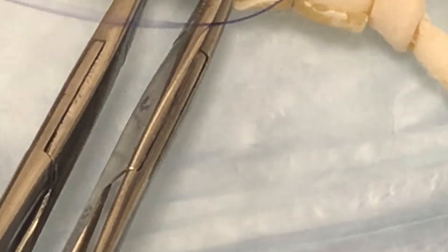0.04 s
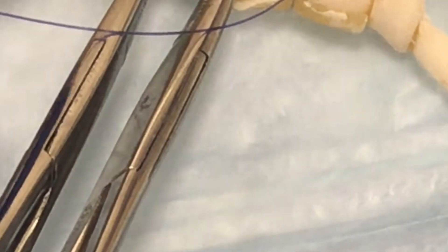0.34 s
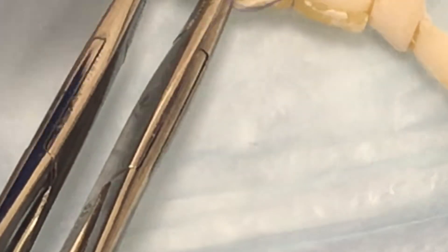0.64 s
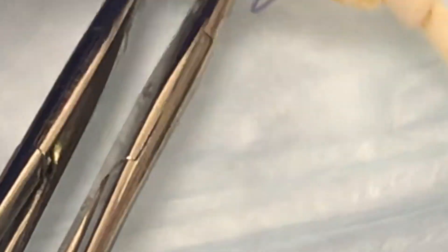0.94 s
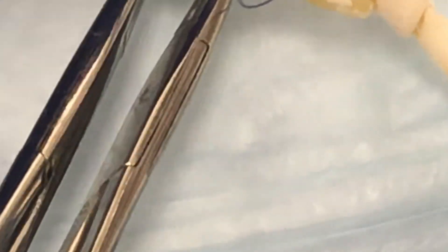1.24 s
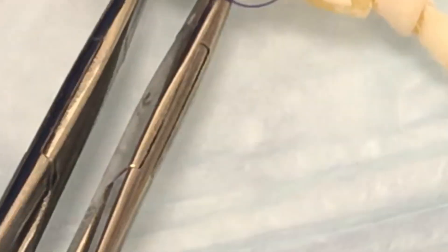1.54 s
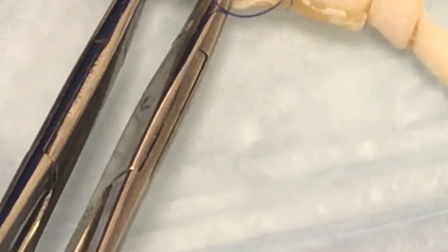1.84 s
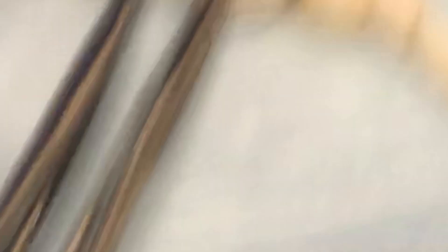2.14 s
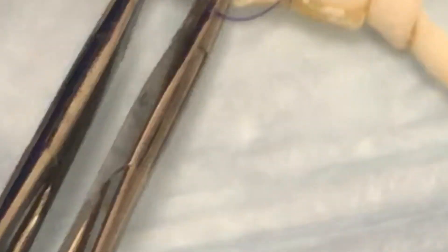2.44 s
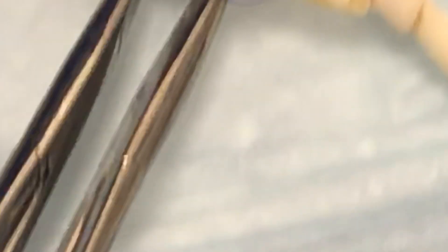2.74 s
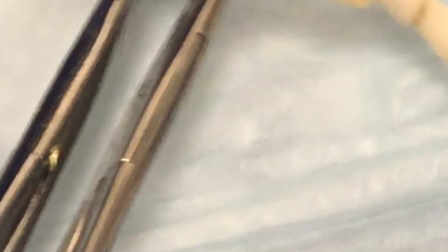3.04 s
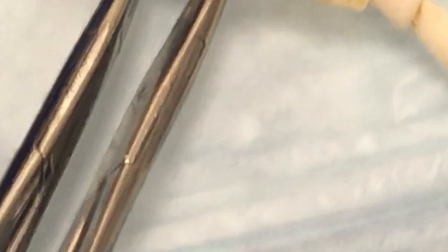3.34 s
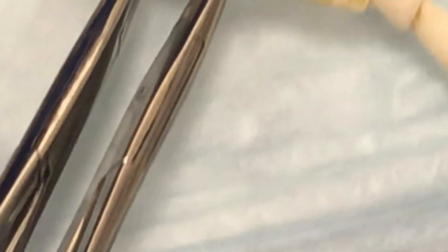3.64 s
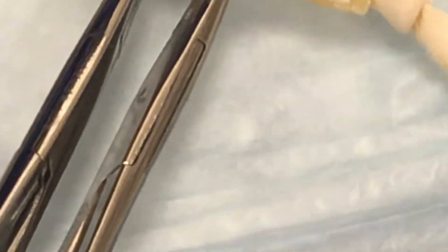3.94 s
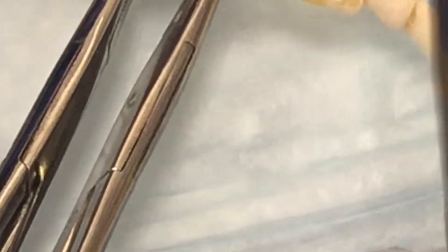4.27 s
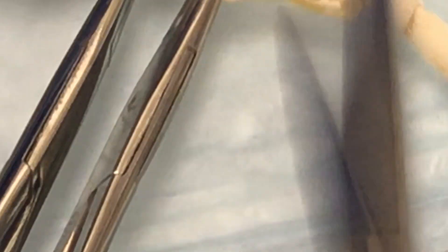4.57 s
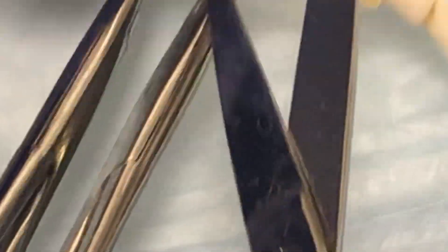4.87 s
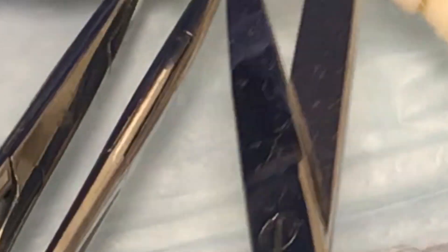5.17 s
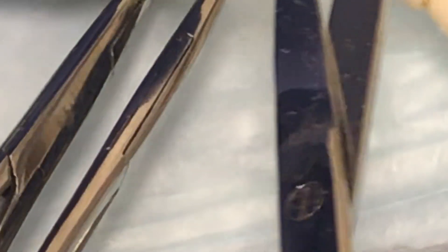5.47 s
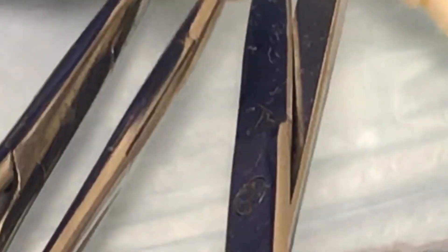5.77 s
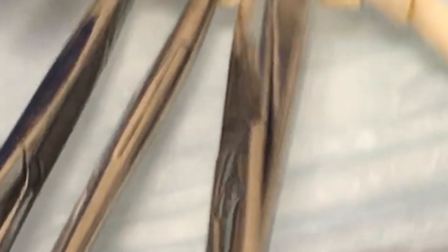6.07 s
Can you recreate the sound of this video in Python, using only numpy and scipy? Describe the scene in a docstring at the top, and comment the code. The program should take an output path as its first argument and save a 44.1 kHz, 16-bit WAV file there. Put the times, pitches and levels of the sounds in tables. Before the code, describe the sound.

In a small room with a low ventilation rumble, steel surgical instruments tick close to the microphone with a light knock, and thread and gloves rustle faintly. Scissors snip once. An instrument skids, clinks and lands on the table with a clack and a soft thud, then more tools knock and slide on the hollow-sounding top. Small ticks and quiet rustling finish it.

```python
"""A suture is tied with steel instruments over a table in a small room, above a low ventilation rumble.
Jaws tick close to the microphone with a light knock, then thread and gloves rustle. At 1.75 s scissors
snip; an instrument skids, clinks and is laid down with a clack and a thud. Until 3.7 s others knock and
slide, sounding the table's top, frame and hollow panel. Small ticks and rustling close the scene."""
import sys
import numpy as np
from scipy import signal
from scipy.fft import rfft, irfft, next_fast_len
from scipy.io import wavfile

SR = 44100
rng = np.random.default_rng(int(sys.argv[2]) if len(sys.argv) > 2 else 0)


def inscribe(sig):
    """Save sig as 16-bit PCM at rate SR to the path in sys.argv[1].

    A 1-D sig is mono; a 2-D sig holds one channel per row.
    Samples are clipped to [-1, 1] before scaling.
    """
    pcm = np.round(np.clip(np.atleast_2d(sig).T, -1, 1) * 32767)
    wavfile.write(sys.argv[1], SR, pcm.astype(np.int16))


N = 278226
TIME = np.arange(N) / SR
AGE = TIME[:SR * 3 // 4]  # time since a contact [s]

# knocks on the table: (time [s], level [dB], contact low-pass [Hz], pitch of the top at that spot [Hz],
# top [dB], frame boom [dB], hollow panel [dB])
TABLE_KNOCKS = [(0.0656, -8.5, 8400, 1454, 3.5, 0.5, -35), (2.115, -8, 1792, 1260, 4.5, -3.5, -1),
                (2.1253, 6.5, 6500, 1230, -0.5, -2.5, -6.5), (2.134, 6, 3500, 1190, 2.5, 2, 0),
                (2.14, 2, 3200, 1400, -8, -8, -8.5), (2.171, -2.5, 6000, 1264, -8.5, -11.5, -5),
                (2.2103, -4.5, 4040, 1271, 0, -10, -11), (2.2152, 9, 7070, 1238, -16, 14, -2.5),
                (2.5388, -1.5, 1700, 1340, -4, 13, -4), (2.6198, -4, 2000, 1384, 2, -6, -14),
                (2.641, 6.5, 5130, 1470, 4, -5, -2.5), (2.6986, 12, 12500, 1283, 9, 2.5, -2),
                (2.714, 11, 9450, 1329, 4.5, -5, -39), (2.988, -3.5, 3040, 1300, -12, -1, -4.5),
                (3.069, 10.5, 7210, 1267, 5, -2.5, -14), (3.1988, 16.5, 11000, 1153, 4.5, -24, 7.5),
                (3.2016, 13.5, 2200, 1246, -7.5, 0, 11.5), (3.287, -4, 1500, 1215, 9.5, -15, -15),
                (3.3312, 1, 3530, 1150, 2.5, -25, 1), (3.6679, 9, 1970, 1153, -1.5, 4, 1.5)]
# the table top, retuned by each knock: (frequency [Hz], width [Hz], gain [dB])
TOP_MODES = [(1221, 62, -0.5), (1204, 230, -17), (1514, 330, -20), (2070, 160, -17.5), (2550, 130, -19)]
# the boom of its frame: (frequency [Hz], width [Hz], gain [dB])
FRAME_MODES = [(261.5, 9.3, -0.5), (311, 38, -6.5), (385, 70, -24.5)]
# its hollow panel: (frequency [Hz], width [Hz], gain [dB])
PANEL_MODES = [(480, 37, -19), (550, 29, -5.5), (630, 40, -13), (684, 13, -14)]
# EQ of a knock's clatter: (frequency [Hz], gain [dB])
CLATTER_EQ = [(70, -35.5), (160, -19.5), (300, -12.5), (520, -18), (830, -18.5), (1150, -9), (1800, -12),
              (2800, -15.5), (4800, -19.5), (7000, -20), (9500, -20.5), (16000, -18)]
# steel meets steel or table: (time [s], crack [dB], ring [dB], room send [dB], ring time [factor])
STEEL_CLINKS = [(1.9562, -14, 1, -7.5, 0.36), (1.9925, -26, -12, -8.5, 0.56),
                (2.0285, -29, -13.5, -8.5, .6), (2.1257, -13, -16.5, -10, 0.5),
                (2.151, -16.5, -8, -13, 1.4), (2.216, 10, -4.5, 3, 0.77), (2.9893, -26, -11.5, -2.5, .4),
                (3.6656, -37.5, -33, 8, 0.77)]
# EQ of a clink's crack: (frequency [Hz], gain [dB])
CRACK_EQ = [(100, -6), (300, -12), (520, -2), (800, -11.5), (1150, 2), (2000, -0.5), (4000, 1), (5500, 0),
            (8300, -1.5), (11000, -3), (15500, -3)]
# ring of the instrument: (frequency [Hz], gain [dB], base t60 [s])
STEEL_MODES = [(220.6, -44, 0.12), (1076, -48, .2), (1227, -43.5, 0.3), (1580, -48.5, 0.18),
               (2500, -52, 0.19), (2670, -45, 0.15), (4095, -49, 0.06), (4250, -53, 0.12), (4480, -53, 0.1),
               (6100, -54.5, 0.15), (6527, -49.5, .2), (8470, -51, 0.11), (9200, -52, .3),
               (8800, -52.5, 0.089), (10140, -56, 0.18), (11400, -53.5, 0.2), (11800, -46.5, 0.19),
               (11530, -43, .22), (11580, -49.5, .2), (13590, -51, .8), (13860, -50.5, 0.25),
               (14250, -54, .15), (15390, -40, .15)]
# the blades bite through and hit their stop: (time [s], level [dB], t60 [s], high-pass [Hz])
SNIP_HITS = [(1.7519, 3, 0.0018, 189), (1.7527, 0, .003, 1508), (1.755, -6, .014, 9600)]
# EQ of the snip: (frequency [Hz], gain [dB])
SNIP_EQ = [(300, -3), (800, -2), (1300, 1), (1700, -3.5), (2500, 5), (4000, 0.5), (7000, -4), (10000, 0.5),
           (13500, 3), (16000, -3.5)]
# ring of the blades: (frequency [Hz], gain [dB], t60 [s])
BLADE_MODES = [(5423, -55.5, .33), (5749, -58, .35), (7220, -46, 0.24), (8860, -57, .3),
               (11110, -78.5, 0.35), (12000, -53, 0.19), (12770, -51, .18)]
# jaws and ratchets close by: (time [s], level [dB], high-pass [Hz], low-pass [Hz])
JAW_TICKS = [(0.0643, -15, 1760, 3000), (0.1641, -23, 1310, 3100), (1.6078, -17, 7200, 18300),
             (1.8806, -29, 4470, 11300), (3.5735, -33, 2190, 12000), (4.158, -28.5, 2470, 8170),
             (4.204, -25, 3130, 9000), (4.226, -26, 5500, 14000), (4.2511, -16, 2300, 18000),
             (4.5149, -26.5, 1900, 3630), (4.9167, -19.5, 9570, 17820), (5.976, -32, 5080, 10800)]
# the instrument skids on its edge as it is lowered: (start [s], length [s], rasp [dB], squeak [dB])
EDGE_SKIDS = [(1.958, .015, -43.5, -55.5), (1.991, .008, -44, -56), (2.023, .033, -47.5, -48),
              (2.149, .025, -53, -61)]
# steel is pushed across the table: (start [s], length [s], level [dB])
TABLE_SLIDES = [(2.12, 0.025, -59), (2.24, 0.094, -46), (2.524, 0.074, -51.5), (2.79, 0.075, -66.5),
                (2.891, 0.05, -54.5), (2.988, 0.04, -53.5), (3.116, 0.07, -50.5), (3.338, 0.072, -62),
                (3.417, 0.034, -50.5)]
# the weight of the hand lands on the table: (time [s], level [dB])
HAND_THUDS = [(2.219, 4.5), (2.243, 9), (2.538, 5.5)]
# sway of the whole table: (frequency [Hz], width [Hz], gain [dB])
THUD_MODES = [(108, 31, 1.5), (125, 16, -4)]
# thread and gloves rub: (middle [s], length [s], level [dB], high-pass [Hz])
RUB_SWELLS = [(0.193, 0.17, -71.5, 1200), (0.3, 0.049, -68.5, 4000), (0.767, 0.081, -70.5, 3000),
              (0.943, 0.071, -59.5, 2830), (1.133, 0.09, -67, 3000), (1.392, 0.17, -69, 4000),
              (2.594, 0.26, -62, 3500), (3.513, 0.47, -65.5, 3000), (3.908, 0.064, -62, 2500),
              (4.196, 0.097, -59, 2640), (4.255, 0.84, -67, 2420), (4.67, 0.042, -61, 1500),
              (4.83, .1, -70.5, 2506), (5.079, 0.16, -65, 2440), (5.356, 0.045, -65, 1590),
              (5.83, 0.073, -67.5, 1610), (6.022, 0.096, -66.5, 1110), (6.153, 0.27, -70.5, 796)]
# EQ of the rustle: (frequency [Hz], gain [dB])
RUB_EQ = [(1500, 8), (3000, -0.5), (6000, 0.5), (9000, -0.5), (13000, -2.5), (16000, -7.5)]
# EQ of the ventilation's rumble and hiss: (frequency [Hz], gain [dB])
AIR_EQ = [(30, -10.5), (55, 3), (90, -7), (140, -4), (200, -8.5), (300, -14), (450, -18.5), (800, -25.5),
          (1500, -27), (3000, -32), (6000, -37.5), (10000, -38), (16000, -37.5)]
# its drones: (frequency [Hz], width [Hz], level [dB])
VENT_DRONES = [(54.2, 2.7, -66), (118, 1.6, -70), (287, 11, -78), (1083, 64, -81.5)]
# decay of the room: (frequency [Hz], t60 [s])
ROOM_T60 = [(100, 0.69), (260, 0.47), (700, 0.4), (1840, 0.41), (4850, 0.46), (9000, 0.45), (14000, 0.21)]
# EQ of the reverb: (frequency [Hz], gain [dB])
ROOM_EQ = [(60, -0.5), (110, 16.5), (180, 4), (300, 4), (410, -2.5), (650, 6), (1250, -3), (4000, -3.5),
           (8000, -7.5), (15000, -7)]

TICK_T60_S = 0.02  # the fingers damp every tick alike


def knocks(clatter_t60, top_send_db, room_db):
    """Blows drive the table's top, frame and panel by where they land; a soft contact loses treble."""
    out, send = np.zeros(N), np.zeros(N)
    click = signal.unit_impulse(len(AGE))
    frame, panel = resonate(click, FRAME_MODES), resonate(click, PANEL_MODES)
    pulse = equalise(click, CLATTER_EQ)
    for s, db, contact_hz, top_hz, top_db, frame_db, panel_db in TABLE_KNOCKS:
        retuned = [(hz * top_hz / TOP_MODES[0][0], width, gain) for hz, width, gain in TOP_MODES]
        top = from_db(top_db) * resonate(click, retuned)
        boom = from_db(frame_db) * frame + from_db(panel_db) * panel
        clatter = equalise(burst(clatter_t60, edge=0.16), CLATTER_EQ)
        add(out, s, from_db(db) * cut(top + boom + clatter, contact_hz, "low"))
        # the table's modes are strong nearby and spread less into the room
        spread = pulse + from_db(top_send_db) * top + from_db(-2) * boom
        add(send, s, from_db(db + room_db) * cut(spread, contact_hz, "low"))
    return out, cut(send, 9000, "low", order=1)


def clinks(crack_t60, ring_send_db):
    """Steel cracks on contact and rings as the fingers allow; thin shanks feed the room only weakly."""
    out, send = np.zeros(N), np.zeros(N)
    # summed over all directions the crack is one clean pulse
    pulse = equalise(signal.unit_impulse(len(AGE)), CRACK_EQ)
    for s, crack_db, ring_db, room_db, sustain in STEEL_CLINKS:
        held_modes = [(hz, db, t60 * sustain) for hz, db, t60 in STEEL_MODES]
        tone = from_db(ring_db) * ring(held_modes, uneven_db=2.5)
        crack = from_db(crack_db) * equalise(burst(crack_t60), CRACK_EQ)
        add(out, s, crack + tone)
        add(send, s, from_db(room_db) * (from_db(crack_db) * pulse + from_db(ring_send_db) * tone))
    return out, send


def snip(ring_db, thump_db, thump_hz, room_db, send_highpass_hz):
    """Scissors snap shut and ring faintly; the released thread jolts the practice pad with a thump."""
    blades, thump = np.zeros(N), np.zeros(N)
    for s, db, t60, highpass_hz in SNIP_HITS:
        bite = equalise(burst(t60, edge=0.7), SNIP_EQ)
        add(blades, s, from_db(db) * cut(bite, highpass_hz, "high", order=1))
    shut_s = SNIP_HITS[1][0]
    add(blades, shut_s, from_db(ring_db) * ring(BLADE_MODES, uneven_db=1.5))
    jolt = cut(signal.unit_impulse(len(AGE)), thump_hz, "low")
    add(thump, shut_s, from_db(thump_db) * cut(jolt, 70, "high"))
    return blades - thump, from_db(room_db) * cut(blades, send_highpass_hz, "high")


def ticks(room_db):
    """Jaws held in the hand meet in tiny damped clicks."""
    out = np.zeros(N)
    for s, db, highpass_hz, lowpass_hz in JAW_TICKS:
        tick = cut(burst(TICK_T60_S, edge=0.76), highpass_hz, "high")
        add(out, s, from_db(db) * cut(tick, lowpass_hz, "low"))
    return out, from_db(room_db) * out


def skids(width_hz, attack_s, release_t60, room_db):
    """Rapid slips drive the steel's modes, which the contact damps and widens; the edge squeaks."""
    slips = grains(per_s=1400, spread_db=2)
    rasp = unit_rms(resonate(slips, [(hz, width_hz, db) for hz, db, _ in STEEL_MODES[1:]]))
    squeak_modes = [(12200, 220, -4), (12400, 300, 0.5), (12900, 700, -6.5), (15400, 500, -1.5)]
    squeak = unit_rms(resonate(slips, squeak_modes))
    out = np.zeros(N)
    for s, length, rasp_db, squeak_db in EDGE_SKIDS:
        scrape = from_db(rasp_db) * rasp + from_db(squeak_db) * squeak
        out += stroke(s, length, attack_s, release_t60) * scrape
    return out, from_db(room_db) * out


def slides(lowpass_hz, frame_db, panel_db, attack_s, release_t60, room_db):
    """Dense stick and slip of steel on the table keeps its top humming."""
    slips = cut(grains(per_s=6000, spread_db=1.5), lowpass_hz, "low")
    body = resonate(slips, TOP_MODES)
    body += from_db(frame_db) * resonate(slips, FRAME_MODES)
    body += from_db(panel_db) * resonate(slips, PANEL_MODES)
    push = sum(from_db(db) * stroke(s, length, attack_s, release_t60) for s, length, db in TABLE_SLIDES)
    out = push * unit_rms(body)
    return out, from_db(room_db) * out


def thuds(room_db):
    """A soft, heavy push of the hand sways the whole table."""
    out = np.zeros(N)
    sway = cut(resonate(signal.unit_impulse(len(AGE)), THUD_MODES), 170, "low")
    for s, db in HAND_THUDS:
        add(out, s, from_db(db) * sway)
    return out, from_db(room_db) * out


def rustle(crackles_per_s, crackle_db, crackle_highpass_hz, room_db):
    """Thread runs through the jaws and gloves brush: short swells of grainy hiss."""
    hiss = unit_rms(equalise(grains(per_s=3500, spread_db=1), RUB_EQ))
    # the hands never rest quite still: faint crackles at random
    twitches = grains(per_s=crackles_per_s, spread_db=4)
    crackle = signal.fftconvolve(twitches, burst(TICK_T60_S, edge=0.5))[:N]
    out = from_db(crackle_db) * unit_rms(cut(equalise(crackle, RUB_EQ), crackle_highpass_hz, "high"))
    for s, length, db, highpass_hz in RUB_SWELLS:
        during = np.abs(TIME - s) < length / 2
        swell = np.cos(np.pi * (TIME[during] - s) / length)
        out[during] += from_db(db) * swell * cut(hiss[during], highpass_hz, "high")
    return out, from_db(room_db) * out


def ventilation(air_db):
    """A steady bed of rumble and hiss with a few narrow drones."""
    drones = sum(from_db(db) * unit_rms(resonate(rng.standard_normal(N), [(hz, width, 0)]))
                 for hz, width, db in VENT_DRONES)
    return drones + from_db(air_db) * unit_rms(equalise(rng.standard_normal(N), AIR_EQ))


def room(send, build_s):
    """Diffuse echoes build up within milliseconds and die sooner in the treble."""
    noise, hz = rfft(rng.standard_normal(len(AGE))), np.fft.rfftfreq(len(AGE), 1 / SR)
    edges_hz, tail = np.geomspace(40, 20000, 19), 0
    onset = 1 - np.exp(-(AGE / build_s) ** 2)
    for low, high in zip(edges_hz, edges_hz[1:]):
        centre = np.sqrt(low * high)
        envelope = onset * fade(at_hz(ROOM_T60, centre))
        band = irfft(noise * ((hz >= low) & (hz < high)), len(AGE))
        tail += from_db(at_hz(ROOM_EQ, centre)) * band * envelope / np.linalg.norm(envelope)
    return signal.fftconvolve(send, tail)[:N]


def ring(modes, uneven_db):
    """Decaying sines: each touch gives every mode a strength and sign of its own."""
    out = 0
    for hz, db, t60 in modes:
        gain = rng.choice([-1, 1]) * from_db(db + uneven_db * rng.standard_normal())
        out += gain * np.sin(2 * np.pi * hz * AGE) * fade(t60)
    return out


def burst(t60, edge=0):
    """Countless close modes struck at once: dying noise of unit energy; edge adds a close-up click."""
    x = rng.choice([-1, 1], len(AGE)) * fade(t60)
    x = x / np.linalg.norm(x) + edge * signal.unit_impulse(len(AGE))
    return x / np.linalg.norm(x)


def grains(per_s, spread_db):
    """Random micro-slips of uneven size, at unit rms."""
    size = from_db(spread_db * np.minimum(rng.exponential(1, N), 4))
    slipping = rng.random(N) < per_s / SR
    return unit_rms(slipping * size * rng.standard_normal(N))


def stroke(start, length, attack_s, t60):
    """Friction builds up, holds while the push lasts, then dies away."""
    rise = np.clip((TIME - start) / attack_s, 0, 1)
    return rise * from_db(-60 * np.clip((TIME - start - length) / t60, 0, 2))


def fade(t60):
    """Exponential decay after a contact."""
    return from_db(-60 * AGE / t60)


def resonate(x, modes):
    """Parallel resonators: (frequency [Hz], width [Hz], gain [dB])."""
    out = 0
    for hz, width, db in modes:
        radius = np.exp(-np.pi * width / SR)
        feedback = [1, -2 * radius * np.cos(2 * np.pi * hz / SR), radius ** 2]
        out += from_db(db) * (1 - radius ** 2) / 2 * signal.lfilter([1, 0, -1], feedback, x + 1e-18)
    return out


def equalise(x, curve):
    """Minimum-phase EQ: nothing sounds ahead of the attack."""
    size = 2 * next_fast_len(len(x))
    gain = from_db(at_hz(curve, np.fft.rfftfreq(size, 1 / SR)))
    cepstrum = irfft(np.log(gain))
    cepstrum[1:size // 2] *= 2
    cepstrum[size // 2 + 1:] = 0
    return irfft(rfft(x, size) * np.exp(rfft(cepstrum)))[:len(x)]


def cut(x, hz, kind, order=2):
    """Causal low- or high-pass."""
    sections = signal.butter(order, min(hz, 0.45 * SR), kind, fs=SR, output="sos")
    return signal.sosfilt(sections, x + 1e-18)


def at_hz(curve, hz):
    """Read a curve on a log-frequency axis."""
    points_hz, values = np.transpose(curve)
    return np.interp(np.log(np.maximum(hz, 1)), np.log(points_hz), values)


def from_db(db):
    """Decibels to gain."""
    return 10 ** (np.asarray(db) / 20)


def unit_rms(x):
    """Scale to unit rms."""
    return x / np.sqrt(np.mean(x ** 2) + 1e-20)


def add(track, s, sound):
    """Mix a sound in at time s."""
    at = round(s * SR)
    track[at:at + len(sound)] += sound[:N - at]


def scene():
    """Each contact layer gives direct sound and a send to one shared room; the mix is mono."""
    direct, send = np.sum([
        ticks(room_db=-11),
        snip(ring_db=-7, thump_db=13, thump_hz=278, room_db=-8, send_highpass_hz=7500),
        clinks(crack_t60=0.045, ring_send_db=-9),
        skids(width_hz=97, attack_s=0.0074, release_t60=0.12, room_db=-3.5),
        knocks(clatter_t60=0.029, top_send_db=-16, room_db=-2),
        thuds(room_db=-7.5),
        slides(lowpass_hz=2680, frame_db=0.5, panel_db=-11,
               attack_s=0.022, release_t60=0.053, room_db=-8),
        rustle(crackles_per_s=110, crackle_db=-82, crackle_highpass_hz=2780, room_db=-12.5)], axis=0)
    return (direct + room(send, build_s=0.003) + ventilation(air_db=-63.5))[None]


def record(dry):
    """The microphone drops the deepest bass; the top is cut steeply."""
    thinned = cut(dry, hz=42, kind="high", order=5)
    cutoff_hz = 15900
    return signal.sosfilt(signal.ellip(10, 0.1, 80, cutoff_hz, fs=SR, output="sos"), thinned)


dry = scene()
out = record(dry)
inscribe(out)
```